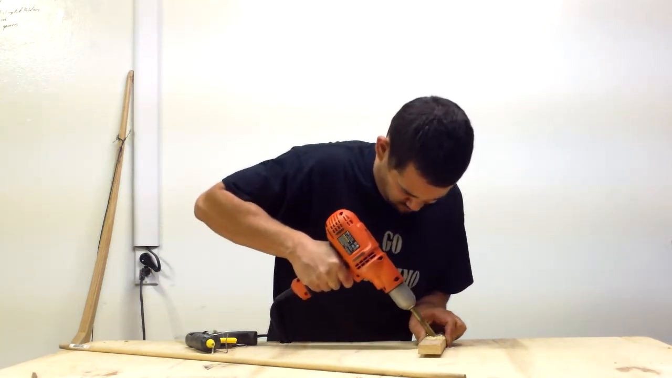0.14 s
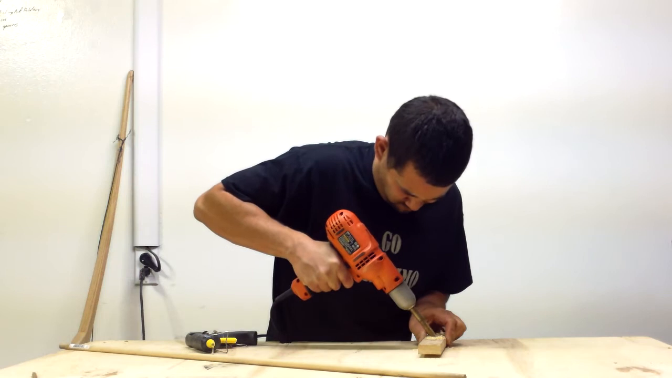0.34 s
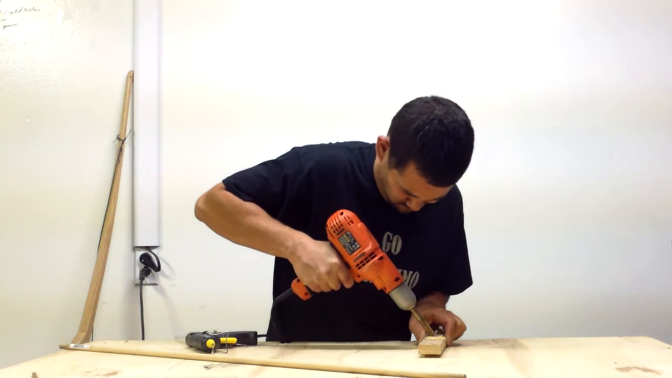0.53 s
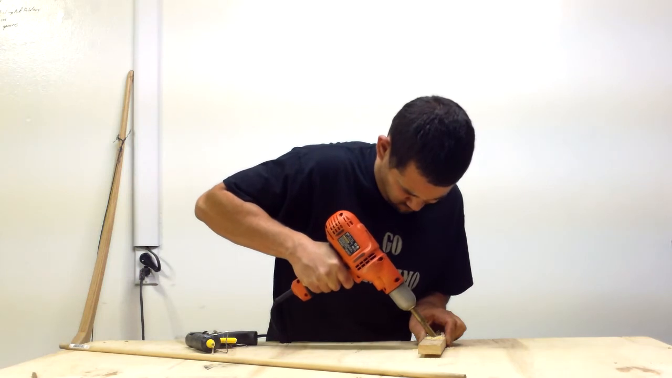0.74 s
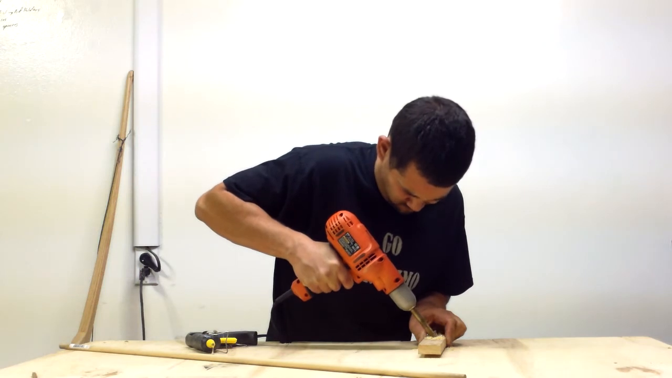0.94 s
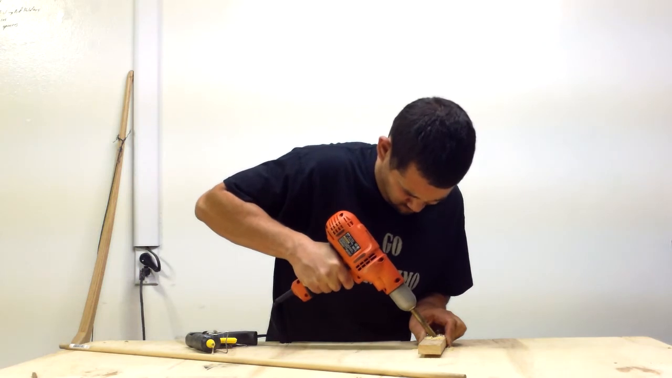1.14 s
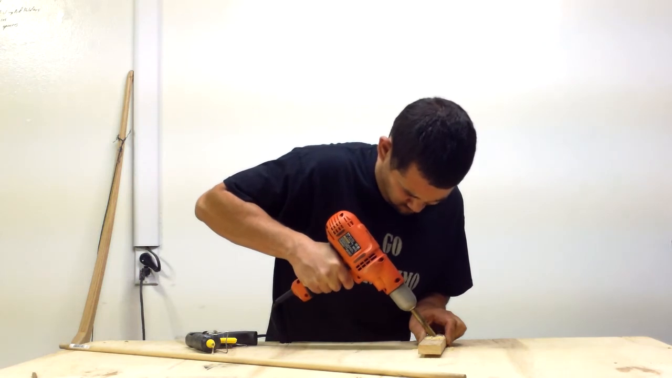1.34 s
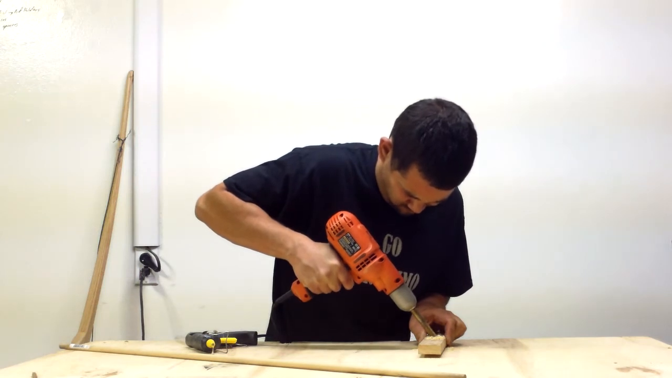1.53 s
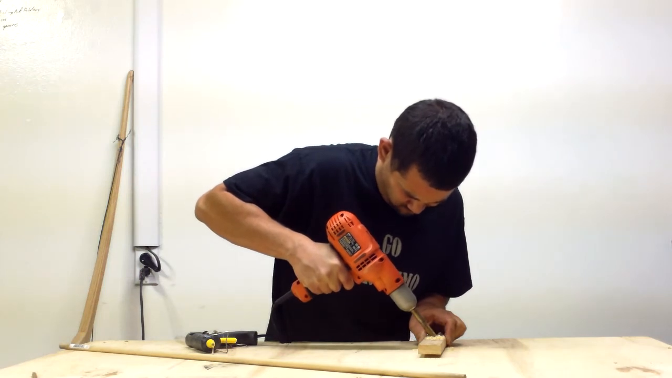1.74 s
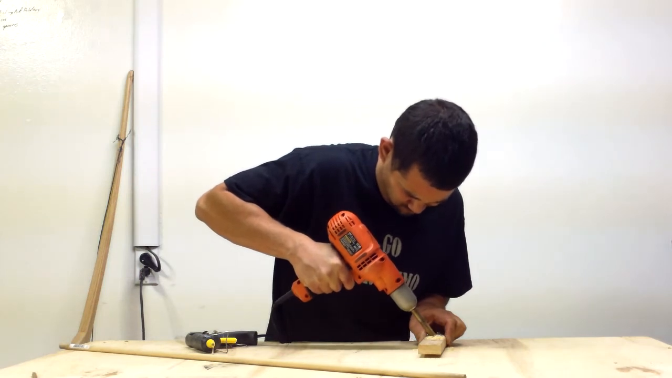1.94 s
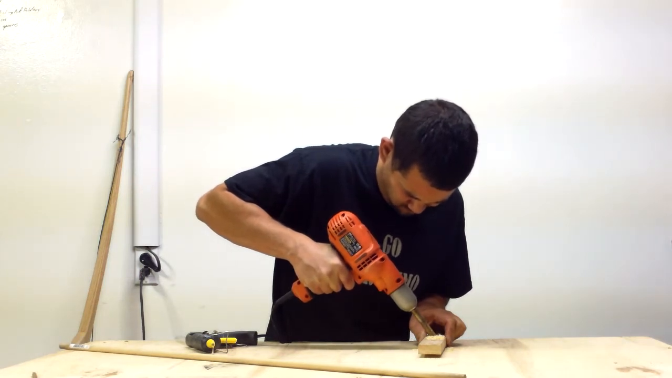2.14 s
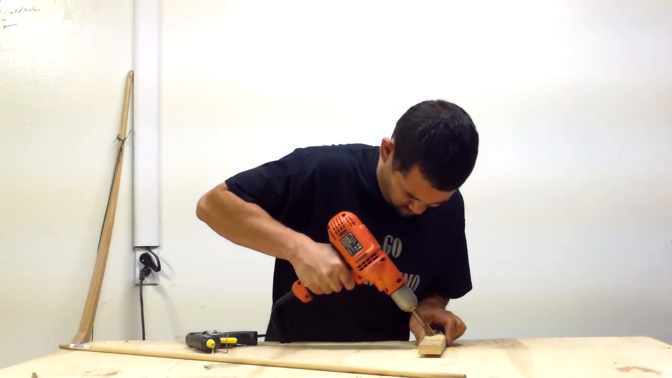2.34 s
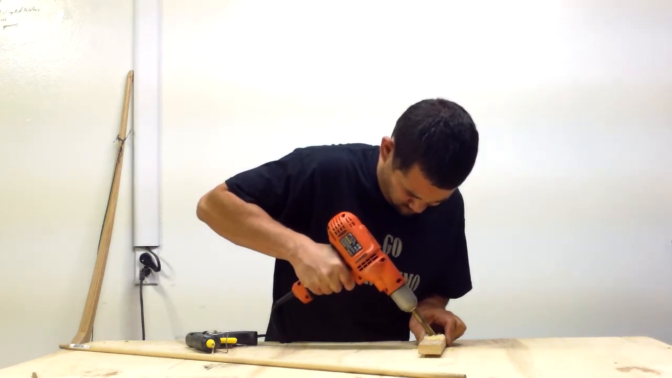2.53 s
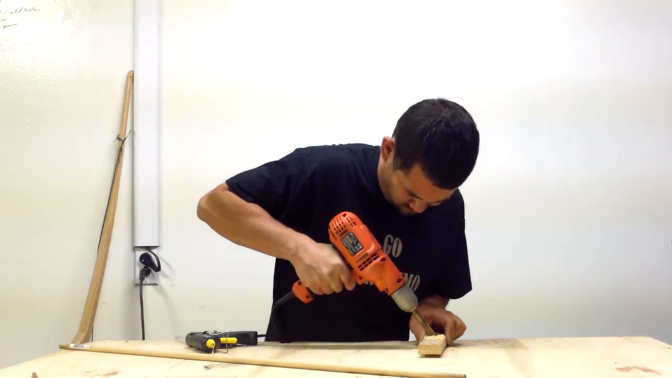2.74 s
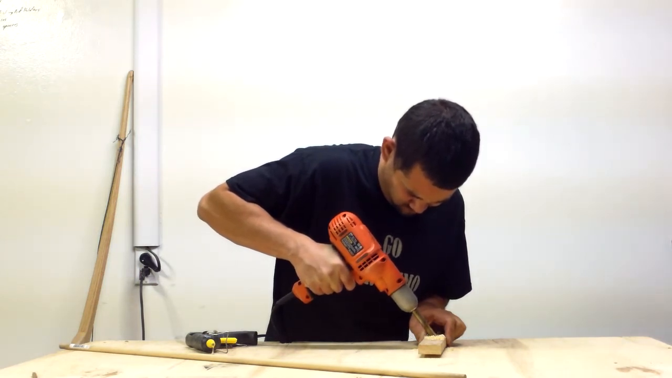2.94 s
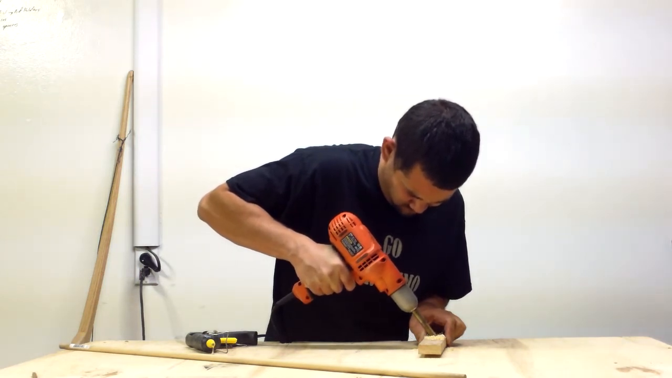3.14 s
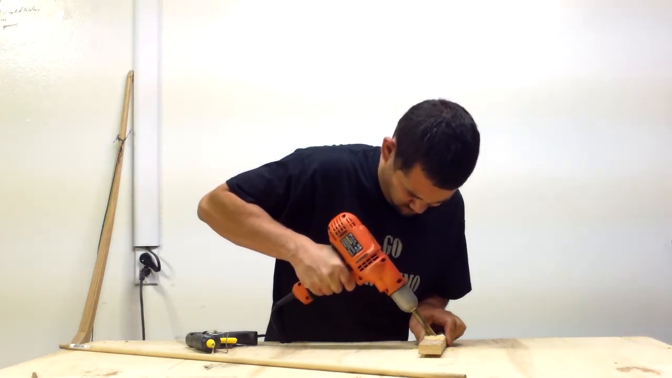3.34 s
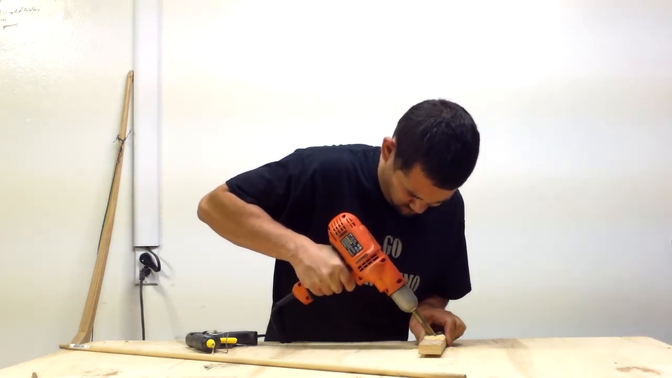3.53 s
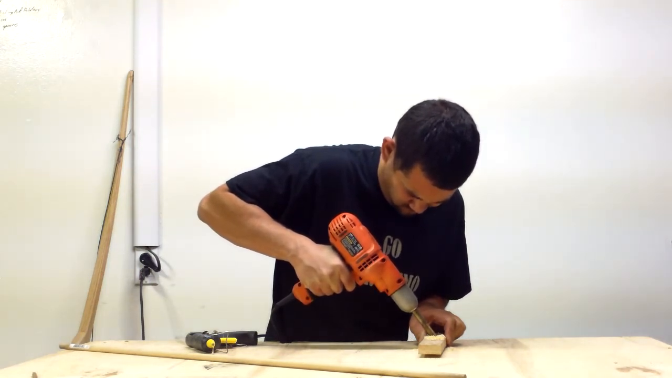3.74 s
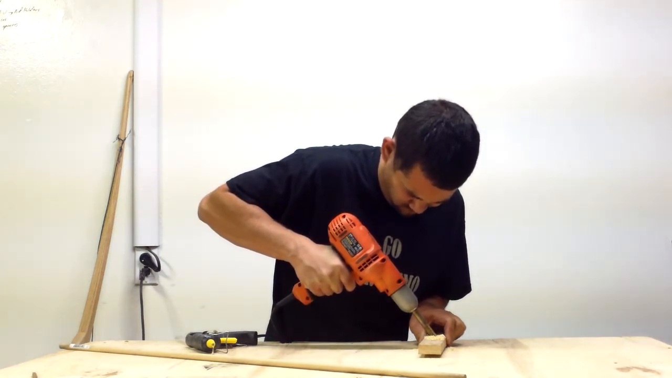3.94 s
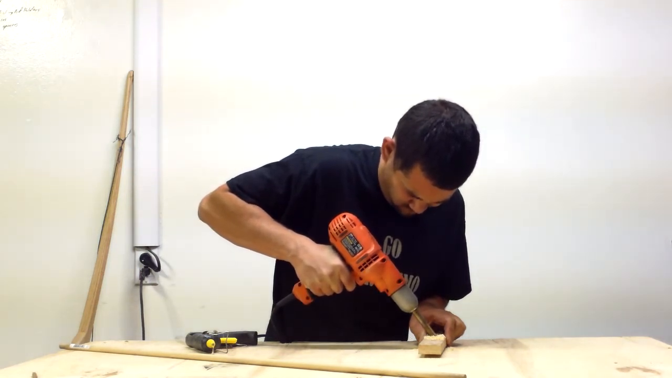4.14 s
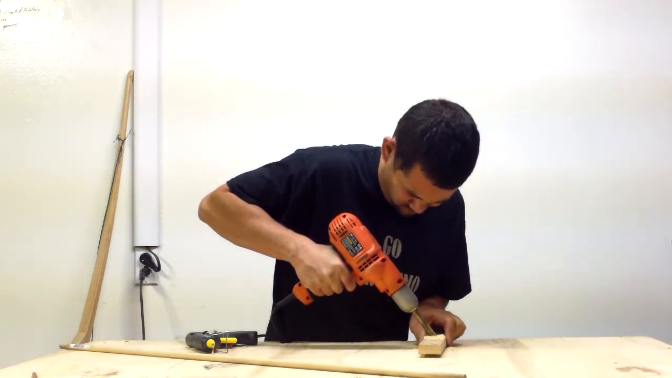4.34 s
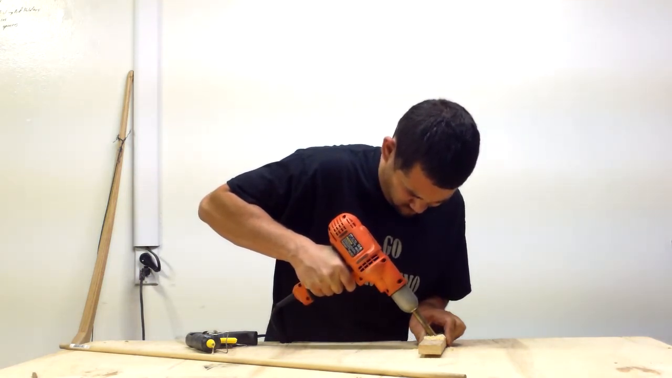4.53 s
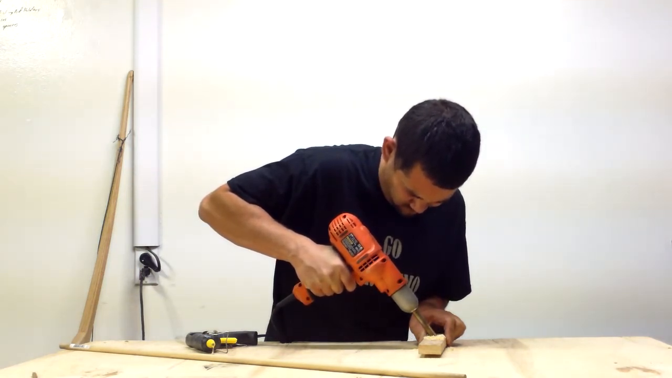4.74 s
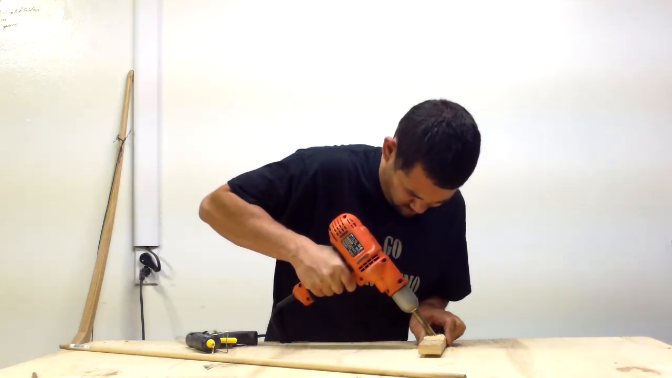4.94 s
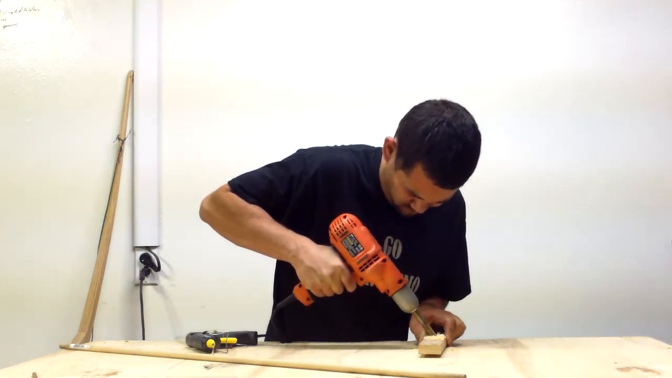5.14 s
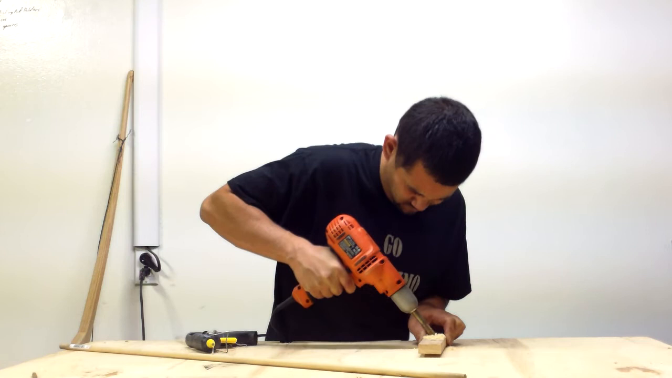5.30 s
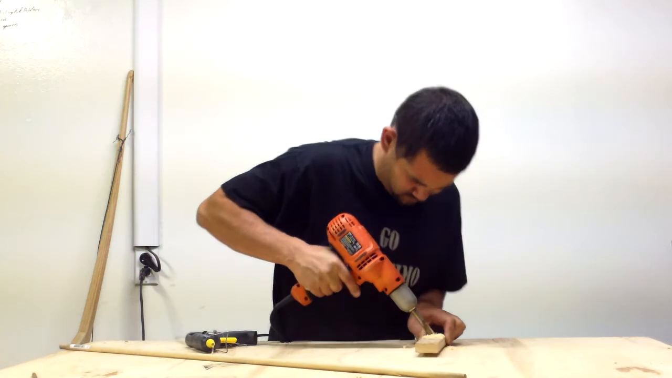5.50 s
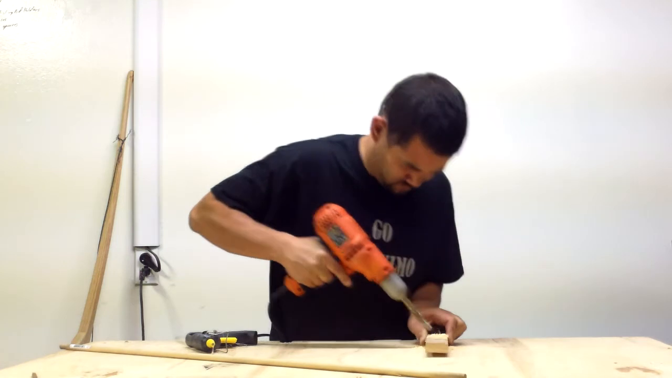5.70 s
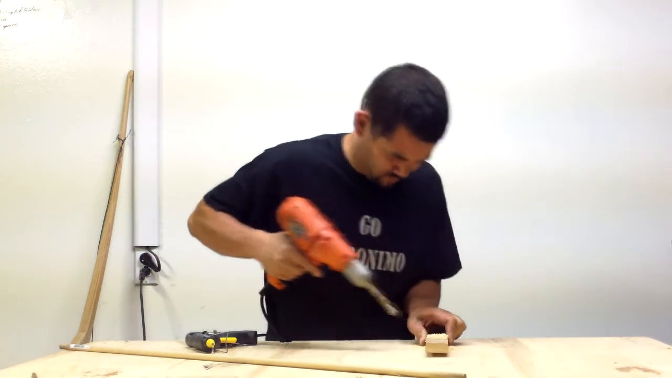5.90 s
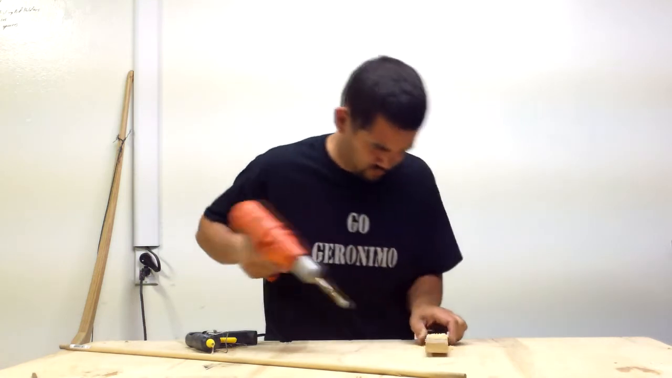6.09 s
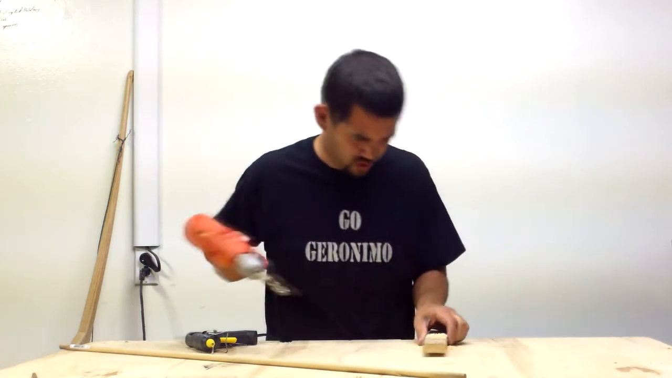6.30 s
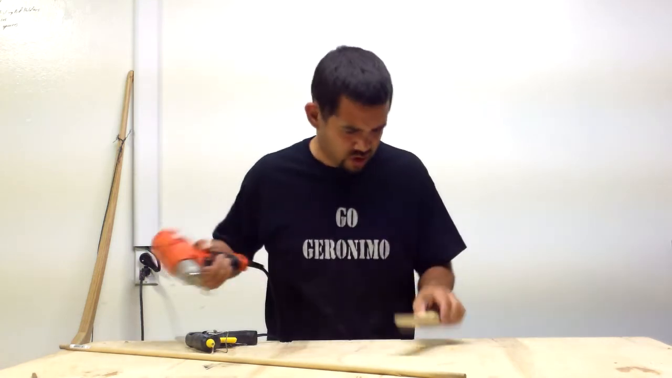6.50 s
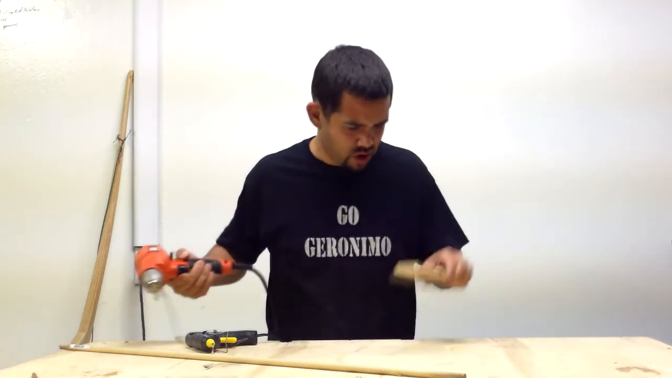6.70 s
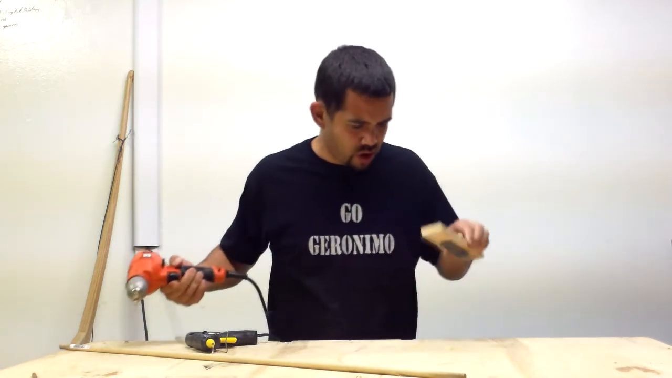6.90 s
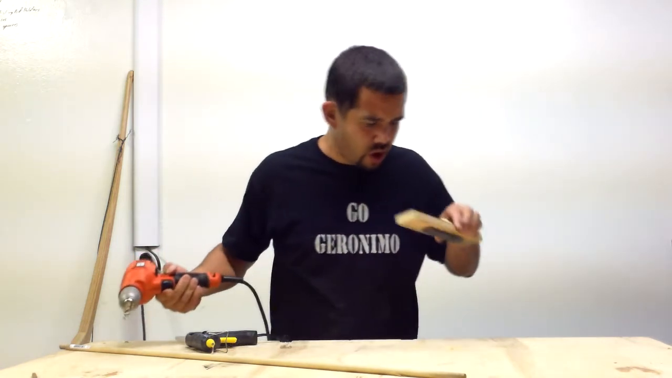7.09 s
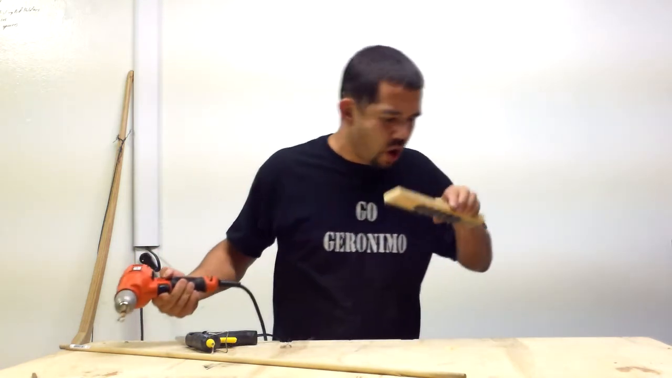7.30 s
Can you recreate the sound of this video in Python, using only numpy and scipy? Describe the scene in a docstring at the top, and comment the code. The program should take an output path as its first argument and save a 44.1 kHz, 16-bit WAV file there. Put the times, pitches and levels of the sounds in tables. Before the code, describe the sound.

Continuous power drilling in wood: nasal motor whine, gritty housing chatter, piercing gear ring and a low wooden rumble with irregular catches. It smooths into a steadier hum midway, then bears down again. After the trigger is let go, the pitch slides down into clicking gear rattle, with a brief airy rub and a few dull plastic knocks. Mono, fairly close, hard-walled little room with faint low rumble.

```python
"""Corded drill in wood

A corded drill bores into a wooden block on a workbench in a small bare room, then is let go and lifted away.
Its motor whines, as sines at multiples of the turn rate, through a seven-tooth pinion. Tooth impacts and
hiss excite the housing and steel gears that ring near 9.5 kHz. The bit, catching now and then, drives
bench resonances into a boom; as the drill coasts down, its slack gears rattle as trains of clicks."""
import sys
import numpy as np
from scipy import signal
from scipy.fft import rfft, irfft, next_fast_len
from scipy.io import wavfile
from scipy.ndimage import uniform_filter1d

SR = 44100
rng = np.random.default_rng(int(sys.argv[2]) if len(sys.argv) > 2 else 0)


def store_pcm(level_fs):
    """Save levels as 16-bit WAV."""
    pcm = np.round(np.clip(level_fs, -1, 1) * 32767).astype(np.int16)
    wavfile.write(sys.argv[1], SR, np.atleast_2d(pcm).T)


N = 324135

TEETH, GEAR_RATIO = 7, 9  # pinion teeth; motor turns per chuck turn
FREE_SPEED, FULL_LOAD_SAG = 284, 25  # turns per s
RELEASE_S = 5.475  # the trigger is let go

# The freely running gears as the drill swings away. Columns: time_s, whirr_hz,
# whirr_db (against the rattle), ring_top_db (gear ring above 10 kHz, unloaded)
SWING = [(5.7, 3050, -16, 1), (5.8, 2970, -5, -6), (6.07, 2740, 2, 2.5), (6.25, 2760, -2.5, -3),
         (6.42, 2800, -1, -1), (6.47, 2900, -18, 1), (6.5, 3900, -3, 0), (6.75, 4050, -2, -6),
         (7.35, 3830, -9, -13)]


def clock():
    """Sampling: time at every sample (s)."""
    return np.arange(N) / SR


def from_db(db):
    """Logarithmic level: decibels to amplitude gain."""
    return 10 ** (np.asarray(db) / 20)


def rms_one(x):
    """Power normalisation: scale to rms 1."""
    return x / np.sqrt(np.mean(x ** 2) + 1e-20)


def in_time(rows):
    """Linear interpolation: each column of a curve at every sample."""
    s, *columns = np.transpose(rows)
    return [np.interp(clock(), s, column) for column in columns]


def bumps(x, rows):
    """Superposition of Gaussian bells along x, one for each (centre, half width at 1/e, height)."""
    return sum(height * np.exp(-((x - centre) / width) ** 2) for centre, width, height in rows)


def drift(rate):
    """Low-passed noise: smooth chance that changes about rate times a second; rms 1."""
    hz = np.arange(N + 1) * SR / (2 * N)
    spectrum = rfft(rng.standard_normal(2 * N))
    return rms_one(irfft(spectrum / (1 + (hz / rate) ** 2))[:N])


def colour(x, spectrum):
    """Linear filtering: pass x through a body with this frequency response; rms 1."""
    size = next_fast_len(N + SR // 4)
    points = np.array(spectrum)
    log_hz = np.log(np.arange(size // 2 + 1) * SR / size + 1)
    knots = np.log(points[:, 0])
    # beyond the outer knots the response keeps falling
    skirt = np.abs(log_hz - np.clip(log_hz, knots[0], knots[-1]))
    response = from_db(np.interp(log_hz, knots, points[:, 1]) - 20 * skirt)
    return rms_one(irfft(rfft(x, size) * response, size)[:N])


def resonate(x, modes):
    """Modal superposition: parallel damped resonators of alternating sign; rms 1."""
    out = 0
    for k, (hz, width, db) in enumerate(modes):
        r = np.exp(-np.pi * width / SR)
        poles = [1, -2 * r * np.cos(2 * np.pi * hz / SR), r * r]
        gain = (-1) ** k * from_db(db) * (1 - r * r) / 2
        out = out + gain * signal.lfilter([1, 0, -1], poles, x + 1e-18)
    return rms_one(out)


def tone(cycles, db, waver_db, waver_hz):
    """Harmonic motion: a sine about the given rms level, its amplitude wavering at random."""
    amplitude = np.sqrt(2) * from_db(db + waver_db * drift(waver_hz))
    return amplitude * np.sin(2 * np.pi * (cycles + rng.random()))


def impacts(cycles, spread_db, scatter):
    """Impulsive excitation: one click a cycle, uneven in size, sign and timing; even power at any speed."""
    at = np.flatnonzero(np.diff(np.floor(cycles)) > 0)
    period = 1 / np.maximum(np.gradient(cycles)[at], 1 / SR)
    size, late = rng.standard_normal((len(at), 2)).T
    when = np.clip(at + scatter * late * period, 0, N - 1).astype(int)
    strength = from_db(spread_db * np.minimum(size, 2)) * np.sqrt(period)
    clicks = np.zeros(N)
    clicks[when] = strength * rng.choice([-1, 1], len(at))
    return rms_one(clicks)


def room(x, wet_db):
    """Reverberation: direct sound plus an exponentially decaying diffuse tail, at about equal total power."""
    decay_60db_s, first_reflection_s = 0.46, 0.003
    t = np.arange(SR // 2) / SR
    tail = rng.standard_normal(len(t)) * from_db(-60 * t / decay_60db_s) * (t > first_reflection_s)
    tail = tail / np.linalg.norm(tail)
    wet = from_db(wet_db)
    return (x + wet * signal.fftconvolve(x, tail)[:N]) / np.sqrt(1 + wet ** 2)


def rumble():
    """Broadband room noise: random pressure shaped by a low spectrum, swelling now and then."""
    # Low room noise. Columns: frequency_hz, response_db
    room_spectrum = [(18, -31), (30, -6.5), (55, -2), (80, -7.5), (105, -3), (145, -15), (215, -20),
                     (245, -5.5), (280, -32), (600, -21.5), (2000, -59)]
    # Swells of the rumble. Columns: centre_s, half_length_s, added_db
    rumble_swells = [(0.05, 0.32, 5), (1.7, .08, 6.5), (4.7, .9, 3), (6.42, 0.4, 7.5), (7.18, 0.37, 9)]
    level_db = -53.5 + bumps(clock(), rumble_swells)
    return from_db(level_db) * colour(rng.standard_normal(N), room_spectrum)


def rotation():
    """Rotational dynamics: load sags the speed; after release quick drag and even friction slow it."""
    # Mean motor speed as the bit is leant on; the last value is where coasting starts from.
    # Columns: time_s, speed_turns_per_s
    driven_speed = [(0.0, 270.9), (0.43, 277.3), (0.65, 274.1), (1.09, 257.4), (1.32, 256.9), (1.75, 261.5),
                    (2.07, 260.1), (2.27, 257.4), (2.52, 243.8), (2.8, 256.1), (2.98, 257.7), (3.23, 264.2),
                    (3.59, 278.4), (4.39, 285.0), (4.81, 285.7), (5.07, 281.0), (5.31, 268.6),
                    (5.45, 272.7)]
    drag_drop, drag_s = 59.5, 0.21  # turns per s; time constant
    friction = 95  # turns per s per s
    coasting_s = np.maximum(clock() - RELEASE_S, 0)
    drag = drag_drop * (1 - np.exp(-coasting_s / drag_s))
    speed = in_time(driven_speed)[0] - drag - friction * coasting_s
    chuck = np.cumsum(speed) / SR / GEAR_RATIO
    # the cut and the off-centre chuck make the speed flutter
    flutter = .0014 * drift(35) + .0014 * np.sin(2 * np.pi * chuck)
    return speed, np.cumsum(speed * (1 + flutter)) / SR


def loading(speed):
    """Torque-speed relation: load 0-1 from the sag below free speed; it reads 1 while coasting."""
    return np.clip((FREE_SPEED - speed) / FULL_LOAD_SAG, 0, 1)


def crossing(hz):
    """Standing waves: gain in dB as a sliding line meets resonances and nulls of shell and room."""
    # Resonances (positive) and nulls (negative). Columns: centre_hz, half_width_hz, gain_db
    standing_waves = [(495, 18, -5), (540, 8, 11), (555, 9, 12), (1076, 10, 7), (1127, 7, 9), (1325, 25, 4),
                      (1566, 12, 5), (1931, 9, -8), (1958, 11, 7), (3480, 80, 6), (3658, 12, 8),
                      (3772, 32, 9), (3895, 40, -8), (7690, 70, 6), (8780, 110, -7), (9020, 70, 4),
                      (9630, 70, 6)]
    grid = np.arange(SR // 2)
    return np.interp(hz, grid, bumps(grid, standing_waves))


def whine(speed, turns, powered):
    """Order spectrum: rotor and tooth lines follow the turn rate; load shifts weight between them."""
    # Strongest lines, levels before growth and standing waves. Columns: order (multiple of turn rate),
    # free_db, loaded_db, release_db, growth_db_per_s, waver_db, waver_hz
    strong_orders = [(2, -42.5, -47, -43, 1.8, 1.05, 31), (4, -43, -41.5, -24.5, 0.16, 3, 19),
                     (7, -29.5, -28, -27.5, 1.0, 2.5, 46), (14, -31, -30.5, -21, -0.87, 3.5, 45)]
    # Weaker lines, levels before standing waves. Columns: order (multiple of turn rate), free_db, loaded_db
    weak_orders = [(5, -56, -39), (6, -47, -39), (9, -36, -46), (10, -47, -50), (11, -38, -42),
                   (12, -36, -38), (13, -48, -47), (16, -43, -45), (17, -45, -47), (18, -47, -46),
                   (19, -45, -47), (33, -34, -46)]
    fade_db_per_s = 34  # before growth
    seating_s, unseated_db = 0.38, 10  # the rotor's low hum comes up as the bit seats itself in the wood
    load = loading(speed)
    engaged, = in_time([(5.69, 0.75), (5.77, 0.017)])
    let_go = np.clip((clock() - RELEASE_S) / 0.037, 0, 1)
    # once the drive lets go, the shaft wanders in its backlash
    turns = turns + .025 * np.sqrt(np.clip(1 - powered, 0, 1)) * drift(40)
    unseated = np.clip(1 - (clock() / seating_s) ** 2, 0, 1)
    strong = 0
    for order, free_db, loaded_db, release_db, growth_db, waver_db, waver_hz in strong_orders:
        driven_db = free_db + load * (loaded_db - free_db) + crossing(order * speed)
        released_db = release_db - fade_db_per_s * (clock() - RELEASE_S)
        level_db = driven_db + let_go * (released_db - driven_db) + growth_db * clock()
        level_db = level_db - unseated_db * unseated * (order < TEETH)
        strong = strong + tone(order * turns, level_db, waver_db, waver_hz)
    weak = 0
    for order, free_db, loaded_db in weak_orders:
        level_db = free_db + load * (loaded_db - free_db) + crossing(order * speed)
        weak = weak + tone(order * turns, level_db, waver_db=2.5, waver_hz=6.3)
    return engaged * strong + powered * weak


def excitation(turns):
    """Contact excitation: tooth impacts over brush hiss; the teeth bear harder once a motor turn."""
    throb = from_db(1.2 * np.sin(2 * np.pi * turns) + .6 * drift(90))
    teeth = impacts(TEETH * turns, spread_db=3.5, scatter=.2)
    return room(throb * (teeth + 0.94 * rng.standard_normal(N)), wet_db=-7.5)


def gears(speed, turns, powered):
    """Forced vibration: the meshing teeth excite the housing and the ringing steel wheels."""
    # Broad responses of housing and gear steel. Columns: frequency_hz, response_db
    housing_spectrum = [(300, -10), (420, -5), (700, -4), (870, -5.5), (1000, 2), (1200, -3), (1700, 0.5),
                        (2300, 1), (2900, 6), (3500, 3.5), (4300, 2), (6000, 2), (7300, -2.5), (9000, -7.5)]
    ring_spectrum = [(6500, -45), (7500, -69), (8000, -7.5), (8500, -3.5), (9050, 3), (9600, 5.5),
                     (10050, 1), (10600, -5), (11300, -9.5), (12300, -14.5), (13300, -21.5), (15800, -28.5)]
    # Narrow rings of the plastic shell and the steel gears. Columns: frequency_hz, width_hz, relative_db
    shell_modes = [(2495, 26, -32), (2990, 70, -8), (3350, 130, 12.5), (3380, 34, 5.5), (3810, 40, 3),
                   (4635, 77, 23.5)]
    gear_modes = [(7960, 90, -9), (9064, 90, -1), (9645, 80, 0), (9795, 90, -2), (10270, 160, -9)]
    # Upper harmonics of the tooth rate. Columns: multiple (of tooth rate), relative_db
    mesh_harmonics = [(3, -16.5), (4, -18), (5, -7), (6, -27), (7, -30)]
    # The harmonics return while coasting. Columns: centre_s, half_length_s, relative_db
    squeal_returns = [(5.86, 0.25, -5.5)]

    halvings = np.log2(FREE_SPEED / speed)
    eased_db = 0.16 * clock()  # gear noise eases as the bit sinks in
    # the housing chatters harder under load; both parts weaken each time the speed halves
    housing_db = -25.5 + 0.5 * loading(speed) * powered - 2 * halvings - eased_db
    ring_db = -18.7 - 3.5 * halvings - eased_db

    on_shell, on_wheels = excitation(turns), excitation(turns)
    broad = from_db(2.5 + 0.45 * powered) * colour(on_shell, housing_spectrum)
    housing = broad + from_db(-5.5) * powered * resonate(on_shell, shell_modes)
    steel = colour(on_wheels, ring_spectrum) + from_db(-9.5) * resonate(on_shell, gear_modes)

    # without load the contacts are softer, and their top changes as the drill turns in the hand
    top_db = in_time(SWING)[2] * (1 - powered)
    soft = signal.sosfiltfilt(signal.butter(4, 10000, fs=SR, output="sos"), steel)
    steel = soft + from_db(top_db) * (steel - soft)

    # uneven tooth spacing smears the high mesh harmonics
    mesh = TEETH * turns + .02 * drift(90)
    squeal = 0
    for k, db in mesh_harmonics:
        level_db = db + crossing(k * TEETH * speed)
        squeal = squeal + tone(k * mesh, level_db, waver_db=4.5, waver_hz=90)
    returning = bumps(clock(), [(s, half, from_db(db)) for s, half, db in squeal_returns])
    pressed = from_db(-0.5) * powered ** 6 + returning
    ring = from_db(1.0 - 1.58 * powered) * steel + pressed * squeal
    return from_db(housing_db) * housing + from_db(ring_db) * ring


def stalling(speed):
    """Speed-dependent excitation: gain that fades the tooth noise at low speed."""
    half_power_speed = 44.3  # turns per s
    return 1 / np.sqrt(1 + (half_power_speed / speed) ** 6)


def catches():
    """Transient envelope: each catch of the cutting edge rises quickly, then decays exponentially."""
    # The edge catches. Columns: peak_s, relative_db
    edge_catches = [(0.358, -20), (0.47, -16.5), (0.789, -17), (0.938, -27), (1.364, -20), (1.666, -17),
                    (1.777, -22), (1.952, -16.5), (2.234, -15), (2.406, -17.5), (2.884, -14.5),
                    (4.985, -20), (5.167, -24), (5.408, -21.5)]
    rise_s, decay_s = 0.014, 0.082
    bursts = 0
    for peak_s, db in edge_catches:
        since = clock() - peak_s
        rise = np.clip(since / rise_s + 1, 0, 1)
        bursts = bursts + from_db(db - 8.5) * rise * np.exp(-np.maximum(since, 0) / decay_s)
    return bursts


def boring(turns):
    """Random forcing of modes: fibres tear unevenly and the bench booms; a steady bit hums on the chuck rate."""
    # Resonances of block and bench. Columns: frequency_hz, width_hz, relative_db
    bench_modes = [(157, 15.4, -11.5), (198, 17, -10), (251.6, 6.1, 5.5), (285.7, 16, -1.5),
                   (321, 16.5, -8.5), (556.5, 12, 1.5), (775, 12, -8), (1047, 55, -20)]
    # The turning bit shakes the bench. Columns: order (multiple of chuck rate), relative_db
    bit_orders = [(5, -5.5), (6, -14), (7, -10.5), (8, 1.5), (9, -3.5)]
    # How steadily the bit turns in its hole. Columns: time_s, steady_share
    steadiness = [(0, 0.57), (.6, 0.3), (1.0, 0), (3.1, 0.11), (3.5, 0.9), (4.6, 0.22), (5.5, 0.1)]
    # The bit bears down harder for a moment. Columns: centre_s, half_length_s, added_db
    cut_swells = [(0.483, .1, 2.5), (3.443, 0.054, 4.5), (5.0, 0.18, 4.5)]
    steady = np.clip(in_time(steadiness)[0], 0, 1)
    chuck = turns / GEAR_RATIO
    tearing = 0.68 * impacts(chuck, spread_db=13.5, scatter=0.1987) + rng.standard_normal(N)
    boom = resonate(tearing, bench_modes)
    # hold the boom's power even over a tenth of a second
    boom = boom / np.sqrt(uniform_filter1d(boom ** 2, size=SR // 10) + 1e-9)
    hum = rms_one(sum(tone(k * chuck, db, waver_db=3.0, waver_hz=20) for k, db in bit_orders))
    # the bit bites, cuts until the release and is drawn out
    in_wood, = in_time([(.3, 0.73), (.38, 1), (5.52, 0.85), (5.62, 0.17), (5.75, 0.23), (5.87, 0)])
    level_db = -32 + bumps(clock(), cut_swells) + 0.99 * drift(14)
    cutting = from_db(level_db) * (np.sqrt(1 - steady) * boom + np.sqrt(steady) * hum)
    # a catch is a dull jolt that mostly moves the bench's low modes
    jolts = catches() * signal.sosfilt(signal.butter(4, 380, fs=SR, output="sos"), boom)
    return in_wood * cutting + jolts


def slack(turns, powered):
    """Backlash: unloaded teeth knock to and fro, with a gliding whirr and a faint falling hum."""
    # Broad response of the rattling gears. Columns: frequency_hz, response_db
    slack_spectrum = [(350, -26), (440, -20), (800, -64), (1050, 10), (1400, 15.5), (1900, 23), (2300, 15),
                      (2850, -17), (3400, -24), (4000, 20), (5500, -17), (8000, -19)]
    # Their resonances. Columns: frequency_hz, width_hz, relative_db
    slack_modes = [(1365, 40, 6), (1840, 180, -5), (2364, 52, 7), (3580, 160, 1), (4660, 460, 2)]
    # Swells as the drive lets go and as the bit comes clear. Columns: centre_s, half_length_s, added_db
    slack_swells = [(5.64, 0.13, 11.4), (6.25, 0.23, 6.6)]
    level_db = -32.5 + bumps(clock(), slack_swells)
    whirr_hz, whirr_db, _ = in_time(SWING)
    knocks = impacts(TEETH * turns, spread_db=3.0, scatter=.25) * from_db(2.2 * np.sin(2 * np.pi * turns))
    knocks = room(knocks, wet_db=2.5)
    rattle = 0.76 * colour(knocks, slack_spectrum) + 0.64 * resonate(knocks, slack_modes)
    # a resonance with a moving centre: shift down, smooth, shift back
    spin = np.exp(2j * np.pi * np.cumsum(whirr_hz) / SR)
    smooth = signal.sosfilt(signal.butter(2, 250, fs=SR, output="sos"), knocks / spin)
    whirr = rms_one((spin * smooth).real)
    # the falling lines are heard mostly as they cross the shell's low resonances
    lines = sum(tone(k * turns, 0, waver_db=4.0, waver_hz=25) for k in (4, TEETH))
    hum = resonate(lines, [(440, 79, 12), (604, 25.4, -15), (780, 95, 7)])
    running_free = rattle + from_db(whirr_db) * whirr + from_db(-27.5) * hum
    return (1 - powered) * from_db(level_db) * running_free


def handling():
    """Impulse response: short dull knocks ring the chuck and the plastic shell."""
    # Light knocks while the drill is lifted. Columns: start_s, relative_db
    light_knocks = [(5.9032, 5.5), (6.1264, -6), (6.1438, -4), (6.2464, 7), (6.3902, 7.5)]
    clicks = np.zeros(N)
    for s, db in light_knocks:
        clicks[int(s * SR)] += from_db(db)
    knocks = resonate(clicks, [(1410, 140, -1), (2760, 440, 5), (4600, 600, -4), (9800, 550, 10)])
    knocks = room(signal.sosfilt(signal.butter(2, 10000, fs=SR, output="sos"), knocks), wet_db=4.5)
    # the highest peak stands 11 dB below the largest click
    return from_db(-11) * knocks * clicks.max() / np.abs(knocks).max()


def rubs():
    """Friction noise: a brief airy rub of the shell sliding in the hand as the drill is lifted clear."""
    # When it rubs. Columns: centre_s, half_length_s, level_db
    rub_times = [(6.165, .04, -35)]
    # Its bright spectrum. Columns: frequency_hz, response_db
    rub_spectrum = [(8000, -15), (10500, 0), (12500, -3), (15500, -16)]
    envelope = bumps(clock(), [(s, half, from_db(db)) for s, half, db in rub_times])
    return envelope * colour(rng.standard_normal(N), rub_spectrum)


def scene():
    """Superposition of drill, wood and room at one microphone."""
    speed, turns = rotation()
    powered, = in_time([(5.47, 0.93), (5.76, 0.024)])
    # as the drive lets go the teeth lose and regain contact, so the whine stutters
    stutter = from_db(4 * np.sqrt(np.clip(1 - powered, 0, 1)) * drift(45))
    lines = room(stutter * whine(speed, turns, powered), wet_db=-10.0)
    # the hand's pressure is never quite even
    pressure = from_db(.55 * drift(16))
    tooth_noise = pressure * gears(speed, turns, powered) + slack(turns, powered)
    drill = lines + stalling(speed) * tooth_noise
    return (rumble() + drill + boring(turns) + handling() + rubs())[None]


def record(dry):
    """Band limiting: an elliptic low-pass cuts the top steeply at 15.75 kHz."""
    return signal.sosfilt(signal.ellip(12, .1, 90, 15750, fs=SR, output="sos"), dry)


dry = scene()
out = record(dry)
store_pcm(out)
```